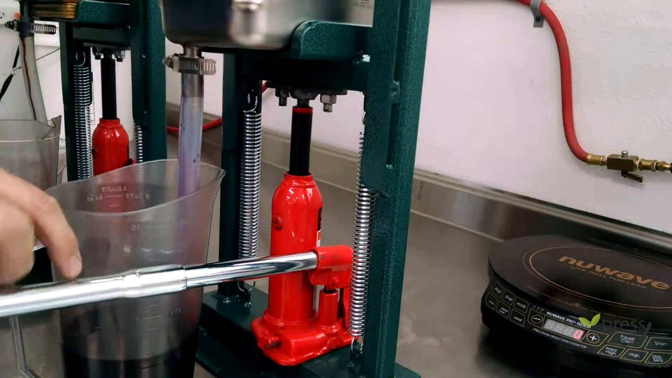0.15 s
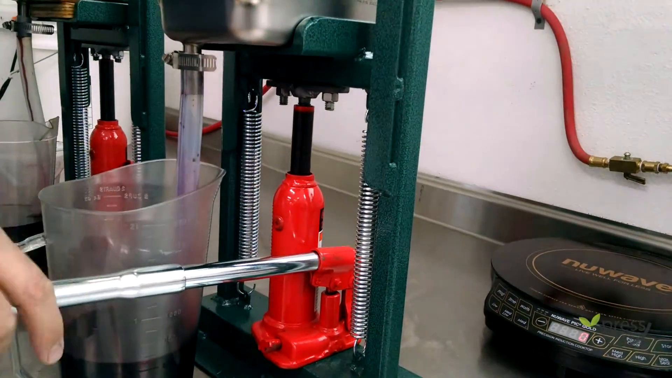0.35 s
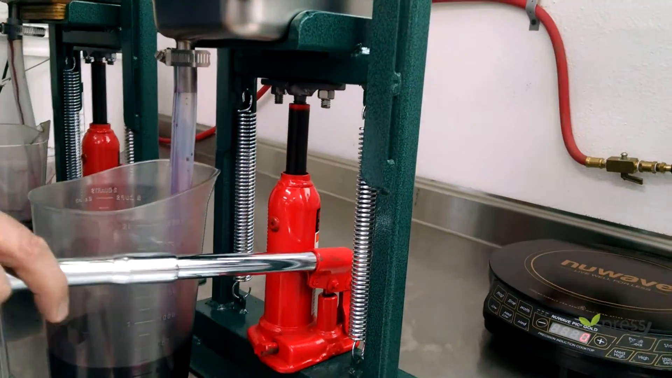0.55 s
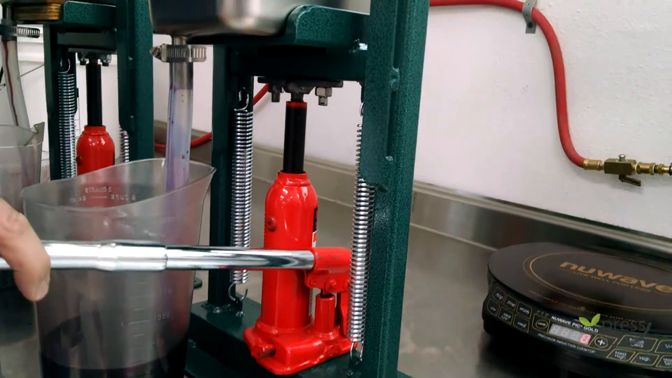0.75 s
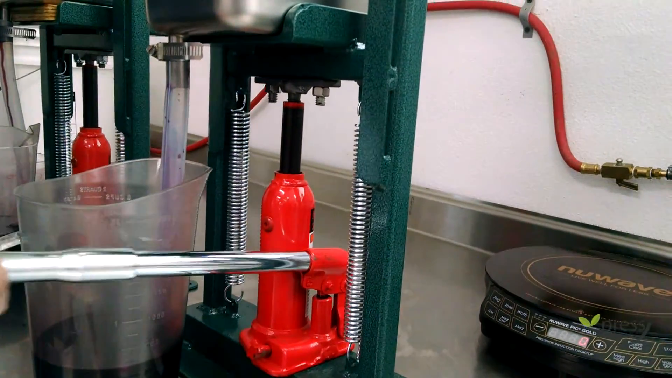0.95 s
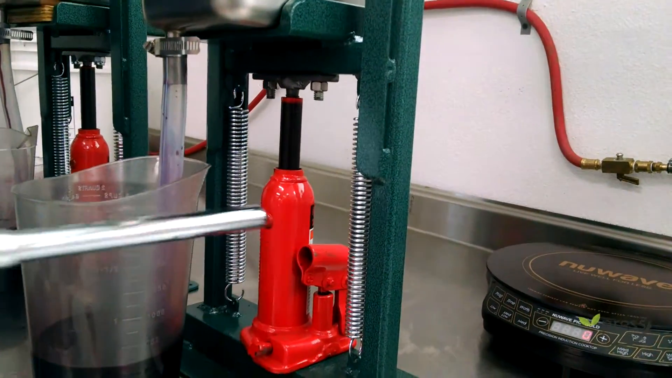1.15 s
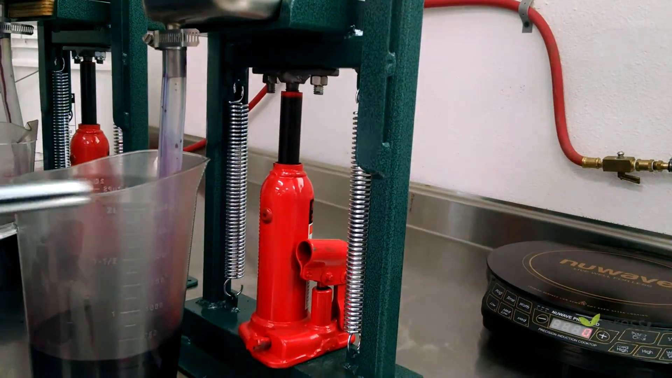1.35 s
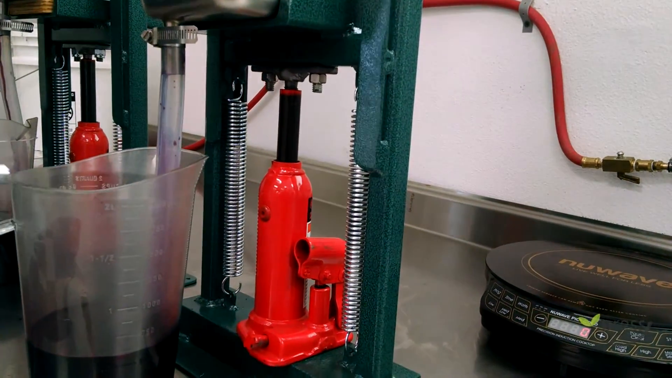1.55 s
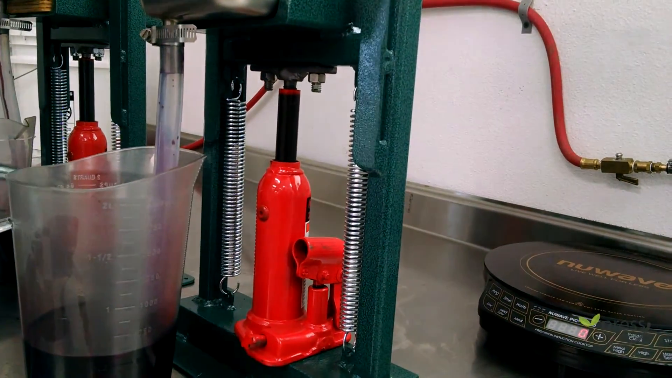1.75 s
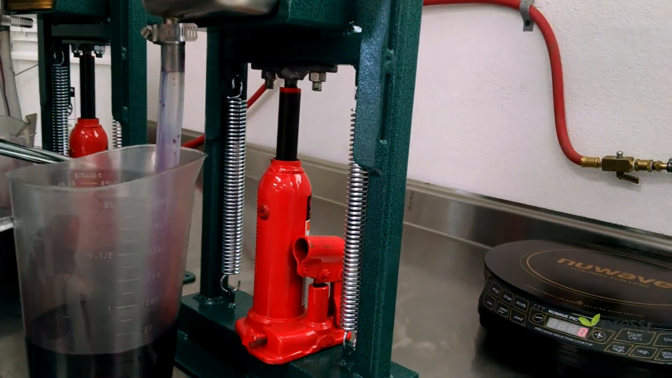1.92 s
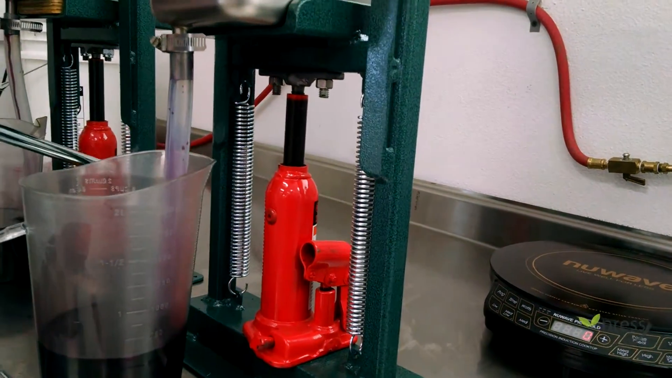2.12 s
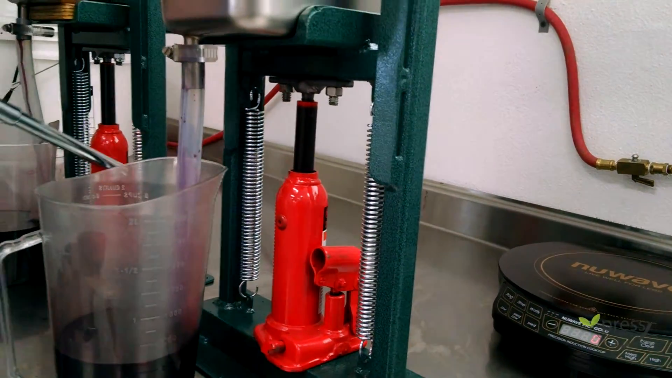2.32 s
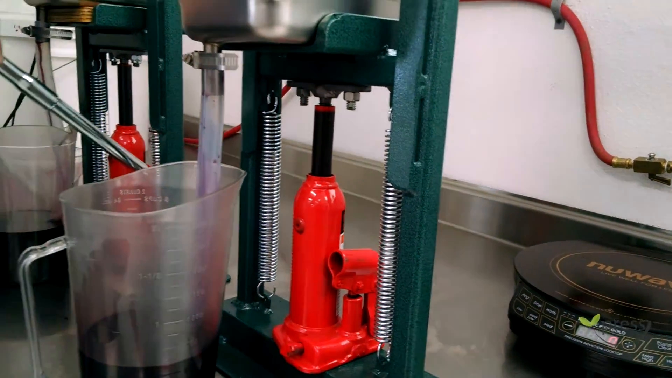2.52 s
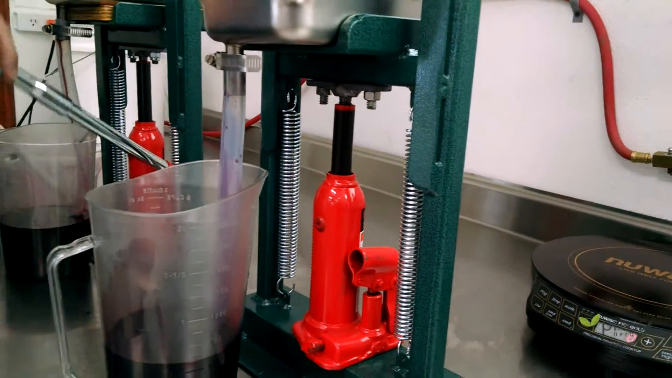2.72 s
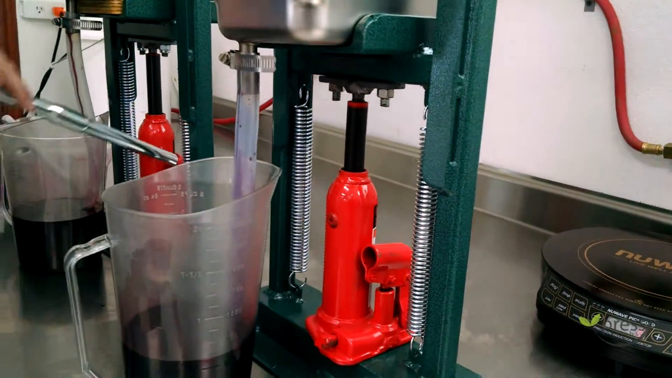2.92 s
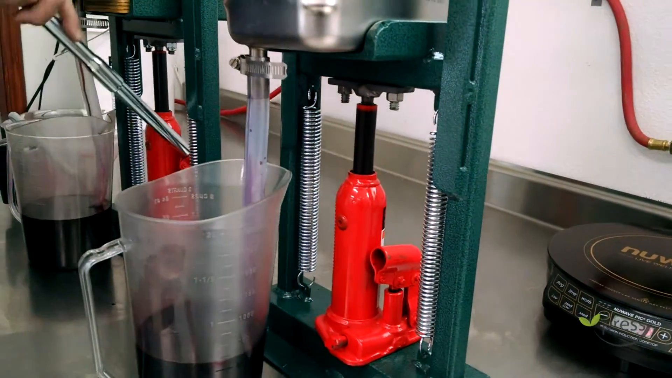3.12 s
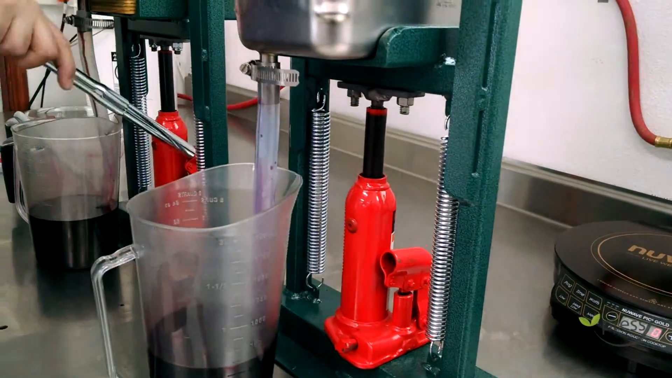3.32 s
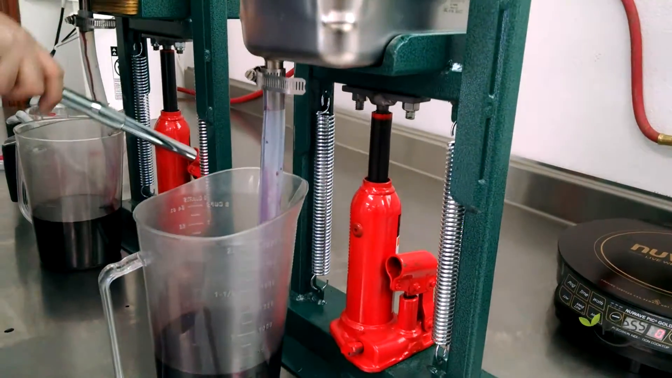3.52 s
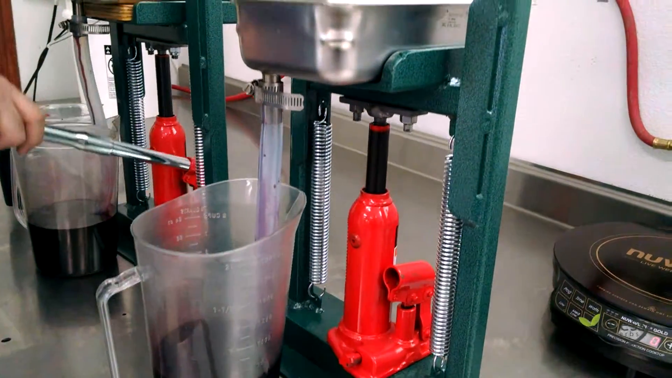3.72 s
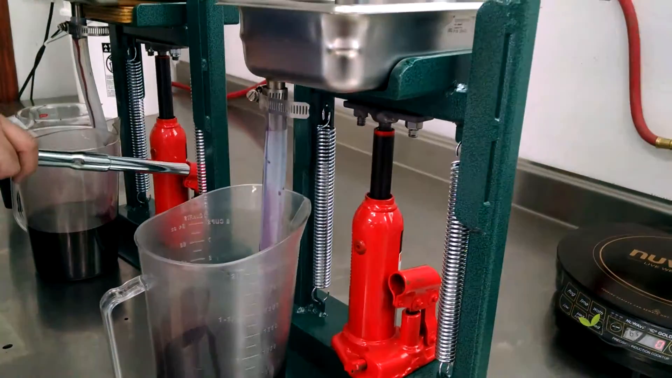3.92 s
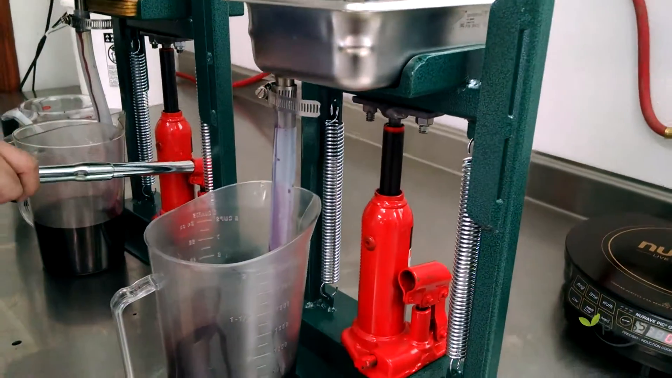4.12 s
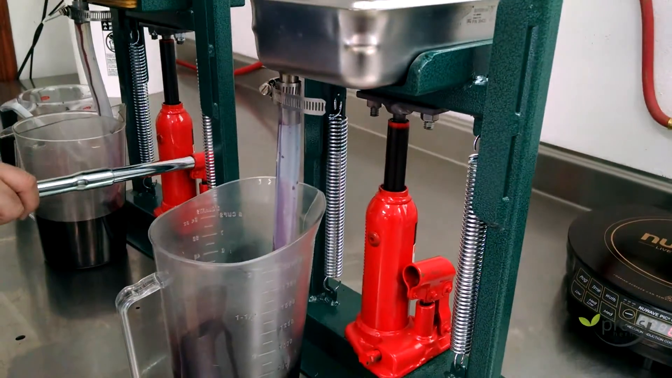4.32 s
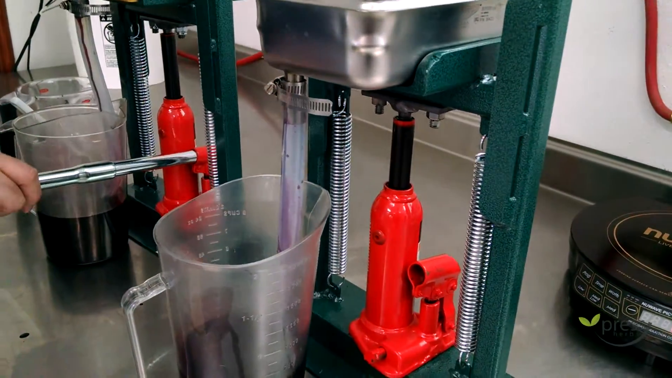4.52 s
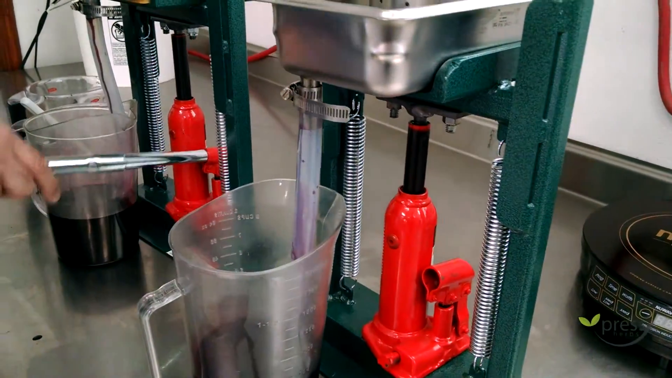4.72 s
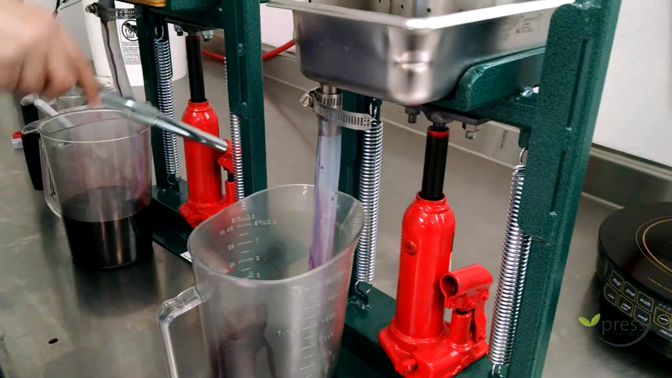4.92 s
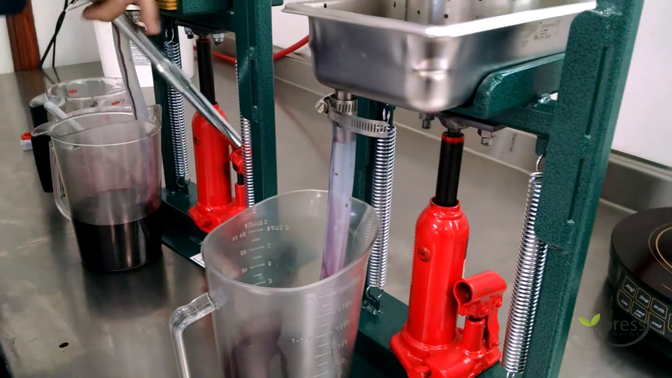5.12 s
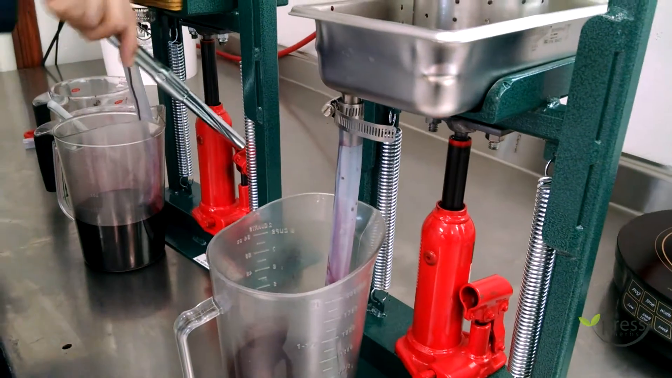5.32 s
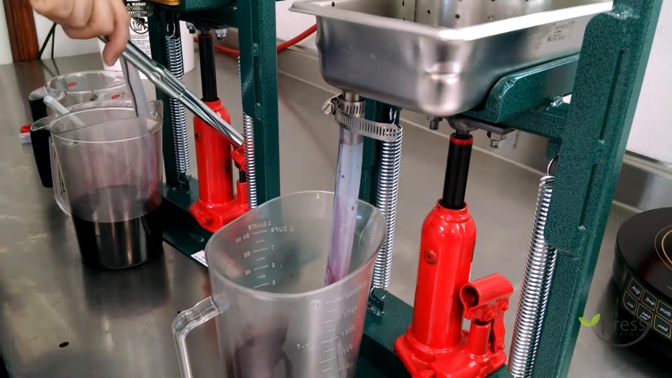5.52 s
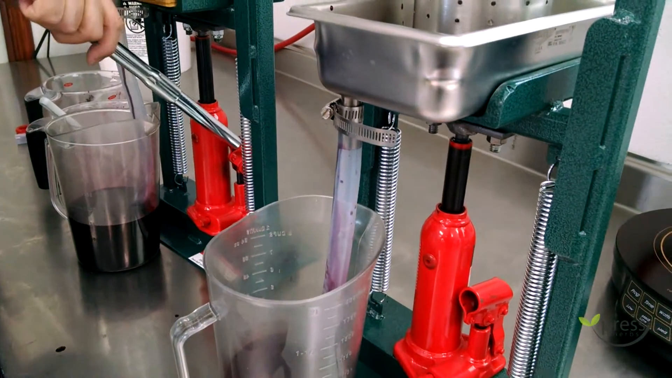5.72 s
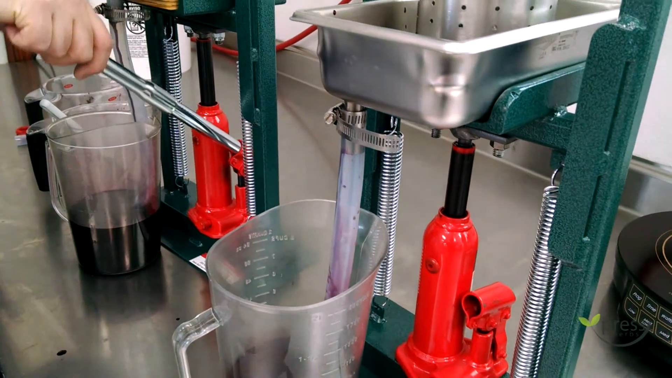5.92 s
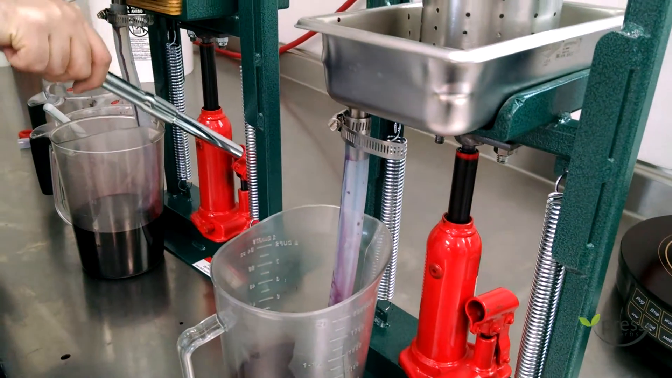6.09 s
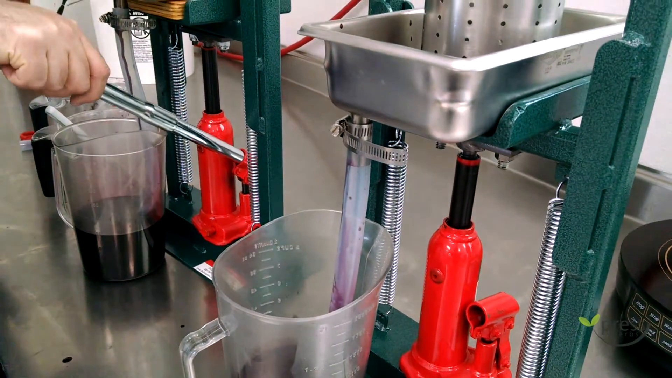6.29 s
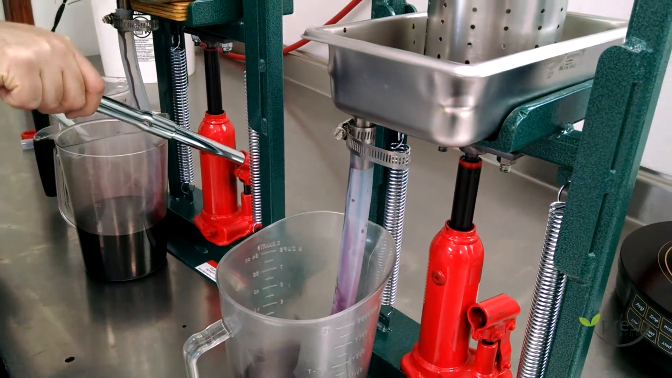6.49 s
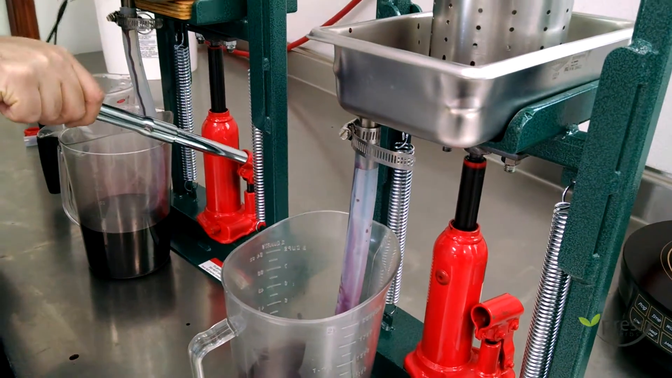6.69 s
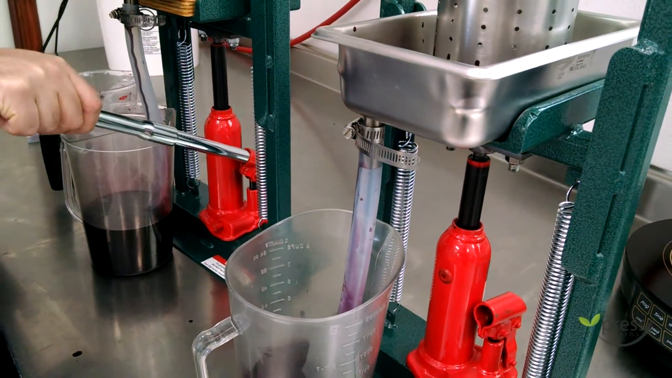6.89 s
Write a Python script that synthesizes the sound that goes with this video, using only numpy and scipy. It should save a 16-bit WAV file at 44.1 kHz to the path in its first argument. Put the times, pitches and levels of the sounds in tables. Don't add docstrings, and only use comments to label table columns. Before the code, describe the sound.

A close, dry-sounding stereo pickup in a hard-walled workroom with short echoes and faint low ventilation rumble. At 0-0.3 s, skin rubs on steel and a loose tube clinks and scrapes with dull knocks. From 0.4 to 1.3 s the grip creeps in soft little hissing slips and low bumps; light clanks at 1.15 and a dull knock at 1.37. Quiet rubbing follows, then clinks at 2.33 and a loud, bright ringing clank at 2.58. Seating hits rattle at 3.0, 3.1 and 3.45 with frame thuds. From 3.7 to 4.8 there are faint scrapes, ticks and hissy rubbing, with a dull double knock at 4.44. At 4.97 a heavy hollow thunk and metallic scrape top the pump stroke. A low motor hum rises at once, eases, swells around 5.8 and again toward 6.95, beneath sparse ticks and soft hand brushes.

```python
import sys
import numpy as np
from scipy import signal
from scipy.fft import rfft, irfft, next_fast_len
from scipy.io import wavfile

SR = 44100
rng = np.random.default_rng(int(sys.argv[2]) if len(sys.argv) > 2 else 0)


def int16_out(signal):
    q = np.round(np.clip(np.atleast_2d(signal).T, -1, 1) * 32767)
    wavfile.write(sys.argv[1], SR, q.astype(np.int16))


def to_linear_factor(level_db):
    exponent = np.asarray(level_db, float) / 20
    return 10 ** exponent


N = 306487
T = np.arange(N) / SR

# pitch_hz, level_db, t60_s
TUBE = [(2100, -6, .03), (3100, -2, .025), (3700, -3, .03), (4080, 0, .055), (4310, -4, .03),
        (5660, -5, .02), (6150, 0, .024), (6580, -3, .025), (7150, -6, .025), (9050, -8, .02),
        (11750, -2, .045), (12200, -3, .02), (13770, 0, .025), (14300, -3, .03)]
# pitch_hz, likeness (-1 to 1)
SAME = [(25, -0.53), (60, -0.34), (130, 0.61), (300, 0.25), (640, 0.65), (1300, 0.75)]
# pitch_hz, left_minus_right_db
LEAN = [(25, -9.5), (60, -4), (125, -5.5), (250, 0.5), (600, -2), (1300, 0)]


def evened(x):
    return x / np.sqrt(np.mean(x ** 2) + 1e-20)


def read(points, hz):
    f, value = np.transpose(points)
    return np.interp(np.log(hz + 1), np.log(f + 1), value)


def add(mix, s, sound):
    part = mix[..., round(s * SR):][..., :sound.shape[-1]]
    part += sound[..., :part.shape[-1]]


def band(x, lo_hz, hi_hz, order):
    return signal.sosfilt(signal.butter(order, [lo_hz, hi_hz], "bandpass", fs=SR, output="sos"), x)


def noise(colour, same=((1, 0), (2, 0)), lean=((1, 0), (2, 0)), size=1024):
    frames, hz = 4 * N // size + 5, np.fft.rfftfreq(size, 1 / SR)
    a, b, c, d = rng.standard_normal((frames, len(hz), 4)).T
    like = np.clip(read(same, hz), -1, 1)[:, None]
    left = a + 1j * b
    right = like * left + np.sqrt(1 - like ** 2) * (c + 1j * d)
    level_db = read(colour, hz) + np.outer([.5, -.5], read(lean, hz))
    z = np.array([left, right]) * to_linear_factor(level_db)[:, :, None]
    return evened(signal.istft(z, nperseg=size, noverlap=3 * size // 4)[1][:, :N])


def ports(pair, far_db):
    lag_s = 1 / 2562
    size = next_fast_len(N + 64)
    near, far = rfft(pair, size)
    late = np.exp(-2j * np.pi * np.fft.rfftfreq(size, 1 / SR) * lag_s)
    far = far * to_linear_factor(far_db)
    stereo = irfft(np.array([near * late + far, -near - far * late]), size)[:, :N]
    return stereo / np.sqrt(1 + to_linear_factor(far_db) ** 2)


def room(x):
    # pitch_hz, t60_s
    decay = [(250, 0.74), (660, 0.41), (1740, 0.3), (4590, 0.29), (12100, 0.23)]
    taps = np.zeros((2, SR // 2))
    at = np.arange(200, SR // 2 - 20, 20)
    at = at + rng.integers(0, 20, (2, len(at)))
    np.put_along_axis(taps, at, rng.choice([-1., 1.], at.shape), 1)
    hz, t, z = signal.stft(taps, SR, nperseg=256)
    tail = signal.istft(z * to_linear_factor(-60 * t / read(decay, hz)[:, None]), SR, nperseg=256)[1]
    return signal.fftconvolve(x[None], tail / np.linalg.norm(tail[0]), axes=1)[:, :N]


def ventilation():
    # pitch_hz, density_db
    rumble_colour = [(40, -17), (120, -1), (200, 3), (260, 0.5), (400, -5), (800, -2), (1200, -9.5),
                     (1700, -18.5)]
    # pitch_hz, density_db
    deep_colour = [(12, -19), (30, 0), (80, -2.5), (130, -9.5), (170, -35.5)]
    rumble = noise([*rumble_colour, (2200, -70)], same=SAME, lean=LEAN, size=2048)
    deep = noise(deep_colour, same=SAME, lean=LEAN, size=4096)
    return to_linear_factor(-38.5) * rumble + to_linear_factor(-45.5) * deep


def motor():
    # start_s, level_db
    load = [
        (0.0, -57),
        (4.8, -54.5),
        (5.01, -42.5),
        (5.3, -50),
        (5.81, -43.5),
        (6.3, -47),
        (6.95, -39.5),
    ]
    # pitch_hz, density_db
    hum_colour = [(90, -24), (100, 11), (104, 6.5), (114, -34), (190, -33), (203, 4), (216, -50)]
    s, hum_db = np.transpose(load)
    wavering = np.sin(2 * np.pi * 101.5 * T + 3 * np.sin(2 * np.pi * .7 * T))
    tone = to_linear_factor([[-3], [1]]) * wavering
    fuzz = 0.35 * noise(hum_colour, same=SAME, lean=LEAN, size=8192)
    return (fuzz + tone) * to_linear_factor(np.interp(T, s, hum_db))


def rub():
    # peak_s, rise_db, half_length_s
    moves = [(0.0, 15.5, 0.26), (0.446, 9, 0.31), (.89, -2, 0.22), (1.953, 7.5, 0.21), (1.65, 4, 0.22),
             (2.75, 4.5, 0.44), (3.77, 7.5, .15), (4.05, 7.5, .55), (4.453, 13, 0.23), (4.8, 7, 0.28),
             (5.254, 5, 0.56), (5.787, -3, 0.31)]
    # pitch_hz, density_db
    bright_colour = [(5000, -3), (8000, 1.5), (10000, 9), (13000, 11), (15000, 8), (16000, -30.5)]
    # pitch_hz, density_db
    dull_colour = [(800, -6), (1500, 1), (2500, 3), (4000, -4), (6000, -8.5), (8000, -12), (11000, -25)]
    move_db = sum(db * np.clip(1 - abs(T - s) / half, 0, 1) for s, db, half in moves)
    bright = ports(noise(bright_colour), far_db=-12) * to_linear_factor(move_db - 54.5)
    dull = ports(noise(dull_colour), far_db=0) * to_linear_factor(0.45 * move_db - 49.5)
    return (bright + dull) * to_linear_factor([[-.5], [.5]])


def clank(blow_db, top_db, t60, ring_hz, ring_db):
    t = np.arange(6000) / SR
    grit = rng.standard_normal(6000)
    crack = grit * np.exp(-(t / .0027) ** 2) * np.minimum(t / .0003, 1)
    rattle = grit[::-1] * min(t60 / .16, 1.3) * np.minimum(t / .003, 1)
    fall_db = -60 * t / np.clip(t60, .02, .3)
    low = band(crack + rattle * to_linear_factor(fall_db), 1650, 7130, order=2)
    top = band(crack + rattle * to_linear_factor(0.85 * fall_db), 10700, 13900, order=2)
    hiss = low / low[:200].std() + to_linear_factor(top_db) * top / top[:200].std()

    modes = np.zeros(6000)
    for (hz, db, life), chance in zip(TUBE, rng.standard_normal(len(TUBE))):
        away_db = 65 * abs(np.log2(hz / ring_hz))
        modes += to_linear_factor(db + 2 * chance - away_db - 60 * t / life) * np.sin(2 * np.pi * hz * t)
    rings = signal.fftconvolve(modes, crack[:40])[:6000]
    return to_linear_factor(blow_db - 2.6) * np.array([hiss, to_linear_factor(ring_db) * rings / rings[:200].std()])


def steel_hits():
    # start_s, blow_db, top_db (over the blow), pitch_hz, ring_db
    clanks = [(0.0288, -31, -5, 3320, -8), (0.0404, -31, 4, 3780, -9), (0.2372, -27, 0, 14300, -4),
              (0.245, -27, -6, 14500, -6), (1.142, -31, -8, 3100, -2), (1.156, -28, -4, 3620, -10),
              (1.185, -34, -2, 3100, -2), (2.3266, -26, -9, 3060, -3), (2.3314, -28, 11, 12000, 11),
              (2.3394, -30, 4, 11700, 3), (2.3835, -36, 3, 6200, 2), (2.9966, -25.5, -2, 5700, -10),
              (4.9077, -22, -7, 3700, -6), (4.9375, -35, -3, 6170, -6)]
    # start_s, blow_db, top_db (over the blow), pitch_hz, ring_db
    blows = [(2.5838, -11, -6, 6250, 4), (2.5845, -18, 1, 13800, 8), (2.5869, -23, -8, 4200, 1),
             (3.107, -20, -7, 11700, -9), (3.124, -29, -18, 6500, -10), (3.1377, -18, -1.5, 3370, -14),
             (3.4213, -33, -5, 11750, -4), (3.442, -25, -4, 11700, -6), (3.4603, -18.5, 4, 12000, -2),
             (3.4705, -27, -6, 3740, 2), (3.4739, -17, -10, 6200, 3), (3.477, -22.5, 3, 14100, 0),
             (4.9698, -16, -6.5, 9050, -8)]
    # start_s, blow_db, pitch_hz
    ticks = [(0.7375, -39, 3670), (1.1129, -41, 3430), (2.9647, -33, 3300), (3.3944, -46, 11800),
             (3.7514, -37, 11700), (3.9993, -35.5, 7000), (4.1315, -33.5, 6340), (4.2474, -39, 6610),
             (4.5137, -35.5, 6800), (4.5474, -37, 11000), (5.3914, -36.5, 11800), (5.5463, -43, 3730),
             (6.2387, -37, 3680), (6.6824, -51, 13700), (6.8054, -44, 14100)]
    # start_s, blow_db, pitch_hz, ring_db
    scrapes = [
        (0.259, -26.5, 4020, -12),
        (3.9, -39, 6170, -1),
        (4.05, -38, 6580, -1),
        (4.9716, -24, 4080, 6),
        (4.994, -28, 4080, 0),
    ]
    loose = [(s, db, top_db, .115, hz, ring_db) for s, db, top_db, hz, ring_db in clanks]
    firm = list(blows)
    for s, db, hz in ticks:
        top_db = -10 + 9 * np.log2(hz / TUBE[6][0])
        firm.append((s, db, top_db, hz, -4))
    seated = [(s, db, top_db, 0.085 - 0.02 * (db + 30), hz, ring_db) for s, db, top_db, hz, ring_db in firm]
    scraped = [(s, db, -11.5, 0.26, hz, ring_db) for s, db, hz, ring_db in scrapes]
    return loose + seated + scraped


def handle():
    steel = np.zeros((2, N))
    for s, *row in steel_hits():
        add(steel, s, clank(*row))
    direct = np.outer([1, .1], steel.sum(0))
    wet = to_linear_factor(-12) * room(steel[0] + .3 * steel[1])
    return ports(direct + wet, far_db=3.0) - to_linear_factor(-22) * steel.sum(0)


def knock(db, hz, thud_db):
    t60_s, rise_turns = 0.071, 1.7
    t = np.arange(8000) / SR
    modes = sum(to_linear_factor(g) * np.sin(2 * np.pi * hz * k * t) for k, g in zip((1, 1.3, 1.9), (0, -8, -19)))
    thud = evened(band(rng.standard_normal(8000), 71, 1320, order=3))
    swell = np.minimum(t * hz / rise_turns, 1)
    return to_linear_factor(db + 1.0 - 60 * t / t60_s) * (modes + to_linear_factor(thud_db) * thud) * swell


def press_frame():
    # start_s, level_db, pitch_hz, thud_db
    knocks = [(0.029, -38, 660, 3), (0.241, -32.5, 455, -0.5), (1.153, -33, 846, -2), (1.189, -39, 834, -3),
              (1.371, -31.5, 750, -16), (2.199, -37.5, 857, -7), (2.326, -32.5, 1425, 3.5),
              (2.335, -26.5, 468, -7.5), (2.349, -27.5, 938, -21), (2.582, -34, 955, -13),
              (2.996, -27.5, 255, -2), (3.008, -23, 582, -4.5), (3.017, -32, 1100, -6),
              (3.137, -34.5, 268, 1), (3.464, -27.5, 260, -3), (3.48, -24, 489, -8),
              (4.4405, -25, 612, -12), (4.449, -24, 248, -14), (4.9712, -11.5, 269.5, -10.5),
              (4.989, -30, 429, -5), (5.039, -27, 246, -8), (5.361, -28, 243, 3)]
    frame = np.zeros(N)
    for s, *row in knocks:
        add(frame, s, knock(*row))
    return frame + to_linear_factor(-9) * room(frame)


def puff(db, length_s, bright):
    hiss = signal.lfilter([1, -bright], [1], rng.standard_normal((2, 7000)))
    shape = np.sin(np.pi * np.clip(np.arange(7000) / SR / length_s, 0, 1))
    return to_linear_factor(db) * band(hiss, 2100, 9000 + 7500 * bright, order=1) * shape


def grip_slips():
    # start_s, push_db
    creeps = [
        (.43, -33),
        (0.616, -26),
        (.751, -25.5),
        (0.852, -24),
        (0.957, -26),
        (1.067, -26.5),
        (1.319, -27),
    ]
    puffs, pushes = np.zeros((2, N)), np.zeros((2, N))
    u = np.arange(900) / SR / .0017 - 3.5
    push = np.outer([1, -.3], -u * np.exp(-u ** 2 / 2))
    for s, push_db in creeps:
        add(puffs, s, puff(push_db - 12.5, length_s=0.02, bright=.1))
        add(pushes, s - .002, to_linear_factor(push_db) * push)
    return ports(puffs, far_db=-20) + pushes


def hand_brushes():
    # start_s, level_db, length_s
    passes = [
        (3.71, -46, 0.12),
        (5.374, -42.5, .11),
        (6.054, -44.5, .1),
        (6.29, -46.5, 0.11),
        (6.655, -52, 0.056),
    ]
    puffs = np.zeros((2, N))
    for s, db, length_s in passes:
        add(puffs, s, puff(db, length_s, bright=1))
    return ports(puffs, far_db=-20)


def scene():
    far = ventilation() + motor()
    return far + rub() + handle() + press_frame() + grip_slips() + hand_brushes()


def roll_off(x):
    return signal.sosfilt(signal.butter(12, 16500, fs=SR, output="sos"), x)


def record(dry):
    duck_from_db, duck_share, duck_lag_s, recover_s = -11, .95, .052, 0.33
    over_db = np.maximum(20 * np.log10(abs(dry).max(0) + 1e-9) - duck_from_db, 1e-6)
    held_db = np.exp(np.maximum.accumulate(np.log(over_db) + T / recover_s) - T / recover_s)
    lag = np.exp(-1 / (duck_lag_s * SR))
    ducked = dry / to_linear_factor(duck_share * signal.lfilter([1 - lag], [1, -lag], held_db))
    edge_hz = [0, 15000, 15300, 15800, 16200, 16500, SR / 2]
    edge = signal.firwin2(301, edge_hz, [1, 1, .02, .012, .004, 0, 0], fs=SR)
    mix = signal.oaconvolve(np.clip(ducked, -1, 1), edge[None], "same")
    return roll_off(mix)


dry = scene()
out = record(dry)
int16_out(out)
```